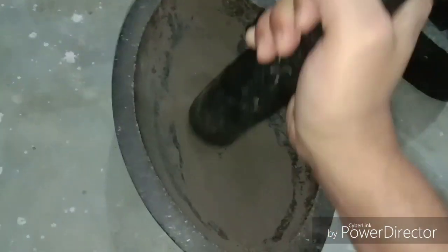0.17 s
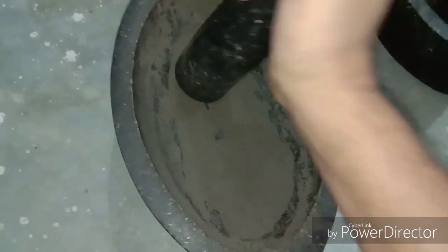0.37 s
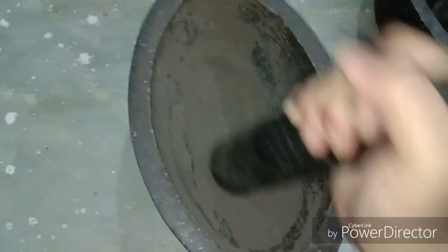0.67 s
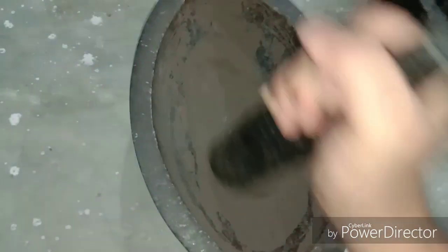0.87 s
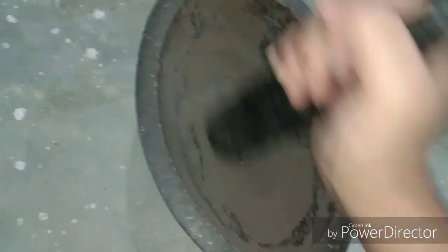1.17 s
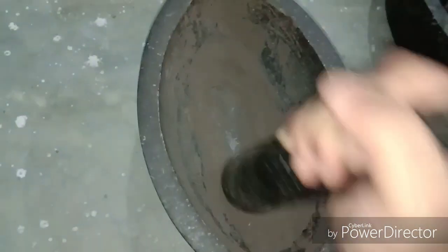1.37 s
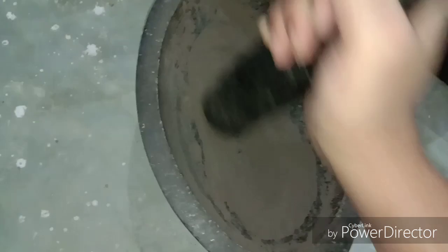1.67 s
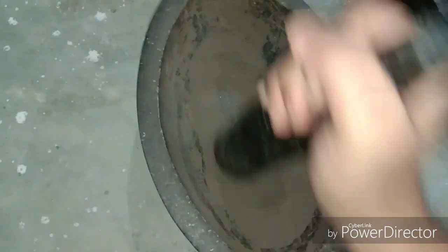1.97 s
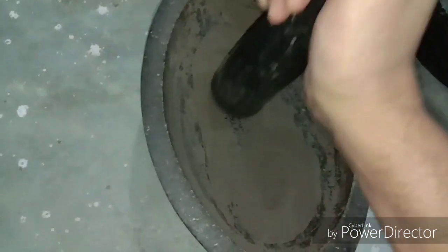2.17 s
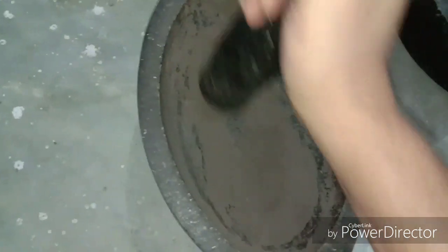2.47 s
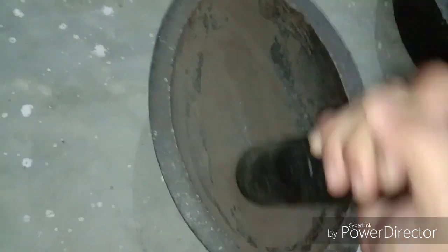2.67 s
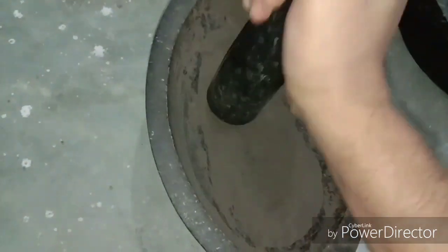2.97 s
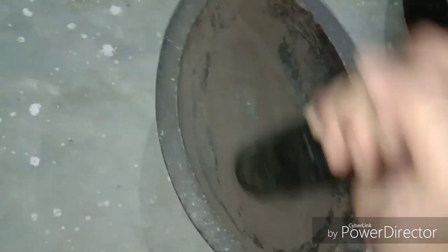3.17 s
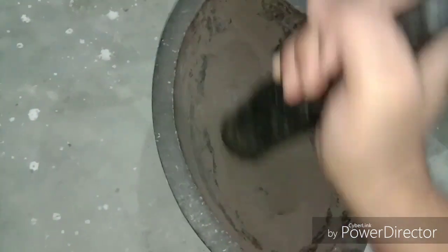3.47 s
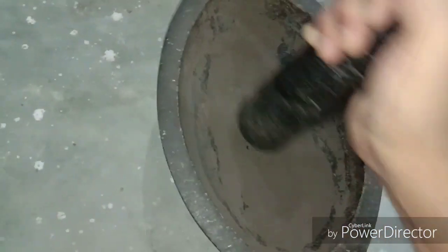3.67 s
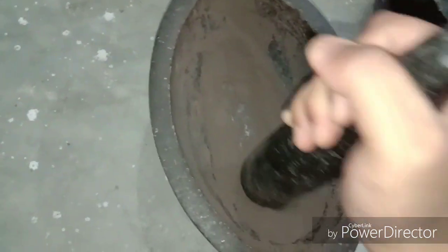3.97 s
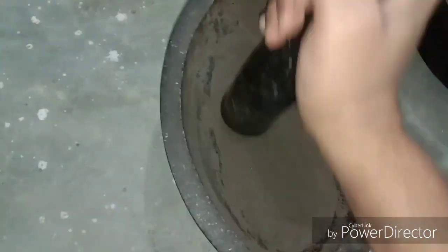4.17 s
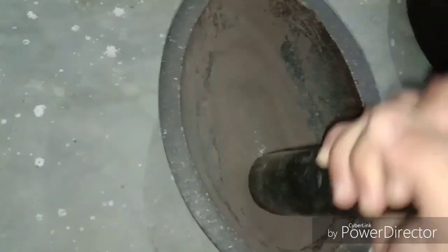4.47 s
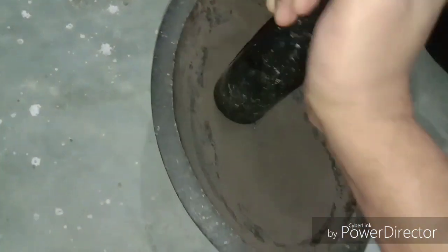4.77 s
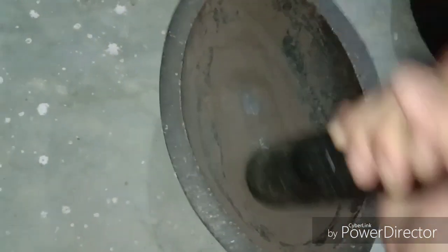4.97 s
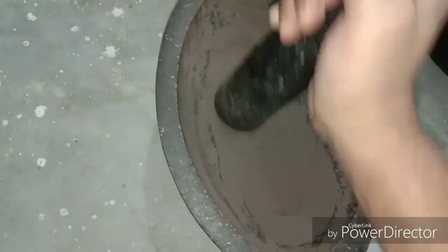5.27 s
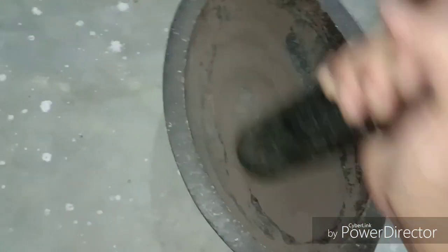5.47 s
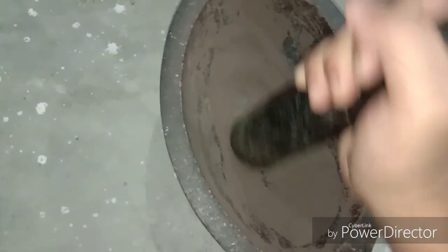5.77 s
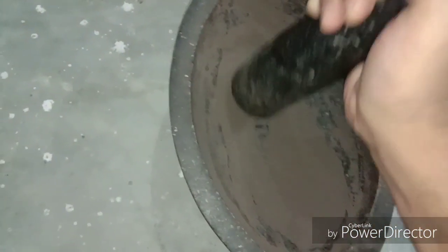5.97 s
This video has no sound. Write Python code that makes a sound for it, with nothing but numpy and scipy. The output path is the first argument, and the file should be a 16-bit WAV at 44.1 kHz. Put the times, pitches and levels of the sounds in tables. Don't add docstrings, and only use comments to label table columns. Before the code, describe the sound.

A stone pestle scrapes back and forth through damp powder in a heavy stone mortar, landing with dull knocks and low rumbles.

```python
import sys
import numpy as np
from scipy import signal
from scipy.fft import rfft, irfft, next_fast_len
from scipy.io import wavfile
from scipy.ndimage import uniform_filter1d, map_coordinates

SR = 44100
rng = np.random.default_rng(int(sys.argv[2]) if len(sys.argv) > 2 else 0)


def to_linear_factor(level_db):
    exponent = np.asarray(level_db, float) / 20
    return 10 ** exponent


def waveform_to_disk(signal):
    frames = np.transpose(np.atleast_2d(signal))
    scaled = np.clip(frames, -1, 1) * 32767
    samples = np.round(scaled).astype(np.int16)
    wavfile.write(sys.argv[1], SR, samples)


N = 269892

# f/Hz, width/Hz, level/dB
FLOOR_MODES = [(124.1, 12.1, 2), (136.8, 18.7, -3.5), (160, 8, -0.5), (187.7, 12.3, -11.5)]
# f/Hz, width/Hz, level/dB
BOWL_MODES = [(224.3, 22.4, -2.5), (265, 11.3, 1), (311.4, 19.5, -6), (344.8, 16, -9.5), (397.4, 28, -8)]
# t/s, peak level/dB, thud level/dB
LANDINGS = [
    (1.166, -37.5, 8),
    (1.69, -36.5, 3),
    (2.429, -38, 4),
    (3.118, -30.5, -22),
    (4.316, -32.5, 0),
    (4.875, -33, 3.5),
    (5.453, -32, -7),
]
# full speed at t/s, held/s, scrape level/dB, grating level/dB, drag level/dB
STROKES = [(0.004, 0.026, -85.5, -112.5, -93.0), (0.085, 0.102, -72.5, -78.5, -93.5),
           (0.637, 0.139, -69.0, -79.5, -81.5), (0.933, 0.1, -67.0, -65.5, -77.5),
           (1.206, 0.089, -68.0, -96.0, -81.5), (1.484, 0.104, -66.0, -66.5, -74.5),
           (1.743, 0.118, -67.0, -72.5, -75.0), (2.016, 0.113, -66.5, -63.5, -75.5),
           (2.207, 0.046, -85.0, -90.0, -101.5), (2.572, 0.169, -68.0, -76.0, -80.5),
           (2.89, 0.104, -66.0, -65.5, -74.5), (3.169, 0.095, -67.5, -67.5, -73.5),
           (3.457, 0.104, -67.0, -66.5, -83.0), (4.005, 0.118, -79.5, -109.5, -95.0),
           (4.096, 0.104, -66.5, -72.0, -85.5), (4.396, 0.105, -67.5, -74.0, -73.5),
           (4.658, 0.112, -65.0, -65.0, -73.5), (4.932, 0.116, -65.0, -78.0, -76.5),
           (5.213, 0.111, -66.0, -65.5, -77.0), (5.491, 0.101, -67.0, -65.0, -74.5),
           (5.778, 0.087, -69.5, -66.5, -84.0)]


def unit(x):
    return x / np.sqrt(np.mean(x ** 2) + 1e-30)


def wobble(rate):
    knots = rng.standard_normal(int(N * rate / SR) + 4)
    return map_coordinates(knots, [np.arange(N) * rate / SR])


def filtered(x, response):
    m = next_fast_len(N + SR // 2)
    return irfft(rfft(x, m) * response(np.fft.rfftfreq(m, 1 / SR)), m)[..., :N]


def ringing(x, modes, low_hz, high_hz):
    def response(f):
        peaks = 0
        for k, (hz, width, db) in enumerate(modes):
            damping = 1j * f * width
            peaks = peaks + (-1) ** k * to_linear_factor(db) * damping / (hz * hz - f * f + damping)
        up = 1j * f / high_hz
        down = low_hz / (1j * f + 1e-9)
        return peaks / ((1 + 1.12 * up + up * up) ** 2 * (1 + 1.005 * down + down * down))
    return filtered(x, response)


def noise(spectrum):
    f, db = np.transpose(spectrum)
    colour = lambda hz: to_linear_factor(np.interp(np.log(hz + 1), np.log(f), db))
    return unit(filtered(rng.standard_normal(N), colour))


def grit(rate, spread_db, smooth):
    crushed = rng.random(N) < rate / SR
    size = to_linear_factor(spread_db * rng.exponential(size=N))
    grains = crushed * rng.standard_normal(N) * size
    return unit(grains) + smooth * rng.standard_normal(N)


def steady(x, seconds):
    width = int(seconds * SR)
    power = uniform_filter1d(uniform_filter1d(x * x, size=width), size=width)
    return unit(x / np.sqrt(np.abs(power) + 0.024 * np.mean(x * x)))


def swell(starts, holds, levels_db, lag, share, rise, fall):
    t = np.arange(0, N + 64, 64) / SR
    since = t - np.c_[starts] - lag
    rising_db = rise * since
    falling_db = fall * (share * np.c_[holds] - since)
    shape_db = np.minimum(0, np.minimum(rising_db, falling_db))
    power = np.sum(to_linear_factor(np.c_[levels_db] + shape_db) ** 2, axis=0)
    return np.interp(np.arange(N) / SR, t, power)


def room():
    # f/Hz, level/dB per Hz
    whine_band = [(2710, -48), (4600, -25), (5280, -28), (5370, -17), (5700, -8.5), (5940, 0), (6100, 3),
                  (6400, -5), (6640, -32), (7300, -41), (9490, -60), (16100, -120)]
    # f/Hz, level/dB per Hz
    hum_band = [(15, -44), (25, -13), (48, -16), (167, 1), (335, -21), (519, -25.5), (876, -24),
                (1040, -28.5), (1550, -27), (1960, -27.5), (2970, -29), (3540, -30.5), (4600, -29.5),
                (5980, -58), (10100, -120)]
    # f/Hz, level/dB per Hz
    hiss_band = [(4120, -31), (7000, -3.5), (7580, -5), (9290, -9), (12100, -6), (13800, -8.5),
                 (14700, -1.5), (15500, -2.5)]
    # f/Hz, width/Hz, level/dB
    motor_lines = [(160, 18, -75), (1527, 10, -96), (2583, 10, -100), (2776, 12, -98), (3022, 8, -101),
                   (3071, 8, -98), (3119, 8, -101), (3168, 8, -97), (3217, 8, -95), (3350, 16, -97),
                   (6160, 10, -90), (15200, 30, -98)]

    whine = to_linear_factor(-73 + 0.8 * wobble(60) + 1.8 * wobble(2.91)) * noise(whine_band)
    lines = 0
    for hz, width, db in motor_lines:
        line = unit(ringing(rng.standard_normal(N), [(hz, width, 0)], hz * 0.9, hz * 0.91))
        lines = lines + to_linear_factor(db + 3.5 * wobble(4)) * line
    return whine + lines + to_linear_factor(-75) * noise(hum_band) + to_linear_factor(-84.5) * noise(hiss_band)


def rumble():
    # f/Hz, width/Hz, level/dB
    wall_modes = [(499, 13, 2.5), (530.3, 39, -5.5), (580, 25, 0.5), (641, 27, -8)]
    # f/Hz, width/Hz, level/dB
    grate_modes = [(717, 42, -0.5), (780, 38.5, 0.5), (877, 50, -2)]
    # bowl level/dB, floor level/dB, held/s
    shudders = [
        (-47.0, -52.5, 0.075),
        (-49.0, -52.0, 0.077),
        (-49.5, -52.0, 0.039),
        (-43.5, -51.5, 0.066),
        (-43.5, -51.0, 0.125),
        (-42.5, -54.5, 0.095),
        (-46.5, -57.5, 0.133),
    ]
    # t/s, held/s, floor level/dB, bowl level/dB
    rocks = [(-0.029, 0.0, -61.5, -62.0), (0.108, 0.108, -63.0, -65.5), (0.233, 0.003, -66.0, -82.0),
             (0.507, 0.131, -54.5, -64.5), (0.675, 0.133, -51.0, -55.5), (0.943, 0.145, -54.5, -57.5),
             (1.091, 0.012, -49.5, -53.0), (1.249, 0.057, -45.5, -50.5), (1.488, 0.14, -46.5, -55.0),
             (1.78, 0.055, -69.5, -51.0), (2.038, 0.124, -47.5, -56.0), (2.241, 0.005, -54.5, -73.0),
             (2.406, 0.178, -51.0, -68.0), (2.628, 0.106, -56.0, -54.0), (2.895, 0.119, -50.0, -58.0),
             (3.013, 0.082, -52.5, -59.5), (3.243, 0.076, -48.5, -55.0), (3.48, 0.115, -49.5, -55.5),
             (3.698, 0.0, -59.5, -58.5), (3.984, 0.08, -53.5, -64.5), (4.12, 0.248, -59.0, -64.0),
             (4.454, 0.066, -57.5, -50.5), (4.674, 0.124, -51.5, -57.0), (4.936, 0.043, -41.5, -50.0),
             (5.077, 0.001, -44.5, -55.5), (5.238, 0.121, -45.5, -56.0), (5.527, 0.021, -44.0, -48.5),
             (5.752, 0.173, -59.5, -61.0), (5.867, 0.092, -62.5, -68.5), (5.988, 0.059, -91.5, -70.0)]

    slid, slides, _, grate_db, _ = np.transpose(STROKES)
    rocked, leans, weight_db, jolt_db = np.transpose(rocks)
    landed = np.transpose(LANDINGS)[0]
    shake_db, thump_db, lasts = np.transpose(shudders)
    wall_db = jolt_db + 0.7 * (jolt_db + 55) - 12

    thrum_gain = np.sqrt(
        swell(rocked, leans, weight_db, lag=.009, share=.455, rise=556, fall=140)
        + swell(landed, lasts, thump_db, lag=.012, share=1.69, rise=900, fall=52))
    bowl_gain = np.sqrt(
        swell(rocked, leans, jolt_db, lag=0, share=1, rise=710, fall=199)
        + swell(landed, lasts, shake_db, lag=.011, share=.77, rise=1500, fall=76))
    wall_gain = np.sqrt(
        swell(rocked, leans, wall_db, lag=.003, share=.4, rise=402, fall=115)
        + swell(landed, lasts, shake_db - 8.5, lag=.011, share=.09, rise=2500, fall=83)
        + swell(slid, slides, grate_db - 2, lag=.046, share=.9, rise=455, fall=305))
    grate_gain = np.sqrt(
        swell(slid, slides, grate_db, lag=.017, share=.71, rise=480, fall=246)
        + swell(landed, lasts, shake_db - 17.5, lag=.011, share=.59, rise=2500, fall=130))

    jolts = grit(rate=420, spread_db=2.0, smooth=0.79)
    thrum = thrum_gain * to_linear_factor(1.0) * steady(ringing(jolts, FLOOR_MODES, low_hz=87, high_hz=340), 0.073)
    bowl = bowl_gain * to_linear_factor(0.5) * steady(ringing(jolts, BOWL_MODES, low_hz=167, high_hz=520), 0.042)
    wall = wall_gain * to_linear_factor(0.5) * steady(ringing(jolts, wall_modes, low_hz=413, high_hz=840), 0.053)
    grate = grate_gain * to_linear_factor(0.5) * steady(ringing(jolts, grate_modes, low_hz=603, high_hz=1010), 0.029)
    deep = thrum_gain * to_linear_factor(-36) * noise([(15, -11), (28, 2), (60, -3), (90, -27.5)])
    return thrum + bowl + wall + grate + deep


def scrape():
    # f/Hz, width/Hz, level/dB
    pestle_modes = [(2218, 13.3, -16.5), (2390, 54, -16.5), (2960, 41, -37), (3270, 22, -7),
                    (4057, 56.3, 4.5), (4420, 360, -5.5), (4451, 94.6, 7.5), (2930, 1440, -24.5),
                    (4760, 300, -8), (5330, 360, -11.5), (5960, 630, -11)]
    # f/Hz, width/Hz, level/dB
    rim_modes = [(6625, 50, 0), (7000, 60, -11), (7492, 35, 0), (9067, 30, -17), (9450, 65, -18),
                 (9980, 50, -20)]
    # f/Hz, width/Hz, level/dB
    drag_modes = [(1123, 150, 7), (1316, 58, 0)]

    s, hold, scrape_db, _, drag_db = np.transpose(STROKES)
    tip_gain = np.sqrt(swell(s, hold, scrape_db, lag=0, share=1, rise=490, fall=227))
    rim_gain = np.sqrt(swell(s, hold, scrape_db - 17, lag=.017, share=.84, rise=333, fall=119))
    drag_gain = np.sqrt(swell(s, hold, drag_db, lag=.052, share=.5, rise=202, fall=251))

    fine = grit(rate=2500, spread_db=2.2, smooth=0.8) * to_linear_factor(2.5 * wobble(40))
    tip = 0
    for part in (pestle_modes[:4], pestle_modes[4:5], pestle_modes[5:7], pestle_modes[7:]):
        tip = tip + ringing(fine * to_linear_factor(3 * wobble(14)), part, low_hz=900, high_hz=11000)
    rim = 0
    for part in (rim_modes[:2], rim_modes[2:3], rim_modes[3:]):
        rim = rim + ringing(fine * to_linear_factor(4.9 * wobble(10)), part, low_hz=5450, high_hz=11000)
    drag = ringing(fine, drag_modes, low_hz=846, high_hz=1750)
    return (tip_gain * to_linear_factor(2.0) * steady(tip, 0.032)
            + rim_gain * to_linear_factor(7.5) * steady(rim, 0.12)
            + drag_gain * to_linear_factor(1.5) * steady(drag, 0.032))


def thock(hz, rise, fall, sag):
    cycles = hz * (np.arange(SR // 25) / SR - 1 / 100)
    turns = cycles / (1 + sag * np.clip(cycles, 0, None)) ** 0.5
    envelope = np.exp(-(cycles / np.where(cycles < 0, rise, fall)) ** 2)
    return np.cos(2 * np.pi * turns) * envelope


def knocks():
    # t/s, peak level/dB, f/Hz, thud level/dB, ring/cycles
    bounces = [(0.936, -68, 487, -6, 0.6), (1.04, -41, 416, -2, 0.48), (1.216, -36.5, 415, 8.5, 0.47),
               (1.735, -38.5, 401, 5, 0.76), (2.041, -50, 401, 13, 0.6), (2.47, -45.5, 514, -5, 1),
               (2.609, -51, 428, -5, 0.5), (3.165, -42.5, 666, 6, 1), (3.2, -35, 422, -11, 0.6),
               (3.212, -40, 423, -5, 0.49), (4.36, -39, 557, -11, 0.97), (4.925, -38, 587, 4, 0.73),
               (5.506, -35, 624, -10, 0.78), (5.514, -36, 407, -4, 0.6)]
    # t/s, peak level/dB, f/Hz
    touches = [
        (0.523, -55, 403),
        (3.985, -53.5, 320),
    ]

    contacts, thuds = np.zeros(N + SR), np.zeros(N)

    def add(start, contact):
        contacts[round(start * SR):][:SR // 25] += contact

    for s, db, thud_db in LANDINGS:
        add(s - .0072, to_linear_factor(db - 1.5) * thock(hz=692, rise=0.93, fall=1.2, sag=0.28))
        add(s + .0008, to_linear_factor(db - 4.5) * thock(hz=410, rise=0.54, fall=1.0, sag=0.15))
        thuds[round(s * SR)] = to_linear_factor(db + thud_db)
    for s, db, hz, thud_db, ring in bounces:
        add(s - .0075, to_linear_factor(db + 3.5) * thock(hz, rise=0.51, fall=max(ring, 0.3), sag=0.35))
        thuds[round(s * SR)] = to_linear_factor(db + thud_db)
    for s, db, hz in touches:
        add(s - .004, to_linear_factor(db + 3.0) * thock(hz, rise=2.1, fall=4.1, sag=0.0076))
    bowl = to_linear_factor(38.5) * ringing(thuds, BOWL_MODES, low_hz=153, high_hz=610)
    floor = to_linear_factor(36) * ringing(thuds, FLOOR_MODES, low_hz=75.4, high_hz=283)
    return contacts[:N] + bowl + floor


def scene():
    heavy = filtered(rumble() + knocks(), lambda hz: 1 / (1 + (hz / 1030) ** 10))
    return np.tile(heavy + scrape() + room(), (2, 1))


def low_pass(x):
    return signal.sosfilt(signal.butter(12, 15680, fs=SR, output="sos"), x)


def record(dry):
    # f/Hz, level/dB per Hz
    port_noise = [(15, -38), (25, -19), (59, -19), (101, -22), (178, -27), (359, -12.5), (523, -12.5),
                  (1800, -18.5), (5880, -12.5), (7910, -23.5), (15500, -21.5)]

    share = wobble(62) * dry[0]
    deep = to_linear_factor(-36.5 + 13 * wobble(13)) * filtered(share, lambda hz: 1 / (1 + (hz / 115) ** 8))
    bright = to_linear_factor(-20.5) * filtered(share, lambda hz: 1 - 1 / (1 + (hz / 750) ** 6))
    side = to_linear_factor(-82.5) * noise(port_noise) + deep + bright
    mix = filtered(dry + [side, -side], lambda hz: hz < 15500)
    return low_pass(mix)


dry = scene()
out = record(dry)
waveform_to_disk(out)
```